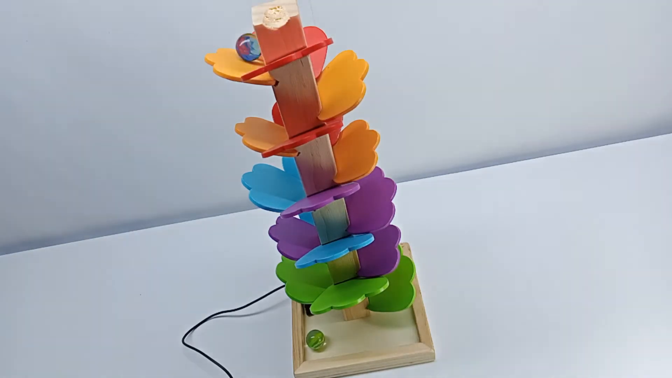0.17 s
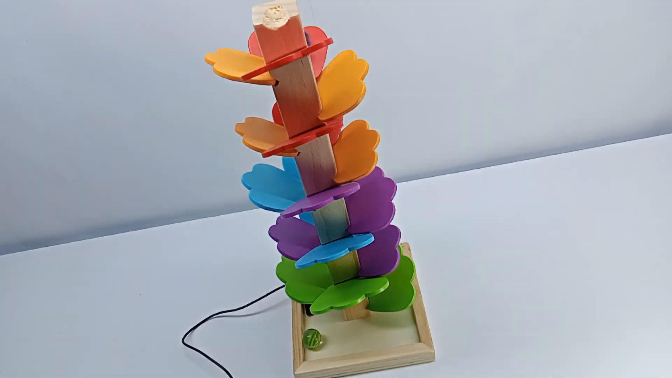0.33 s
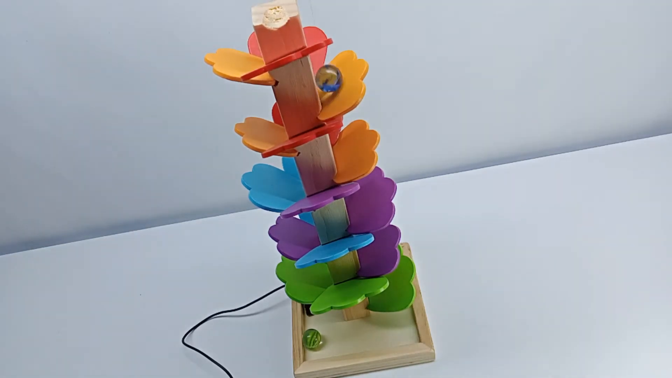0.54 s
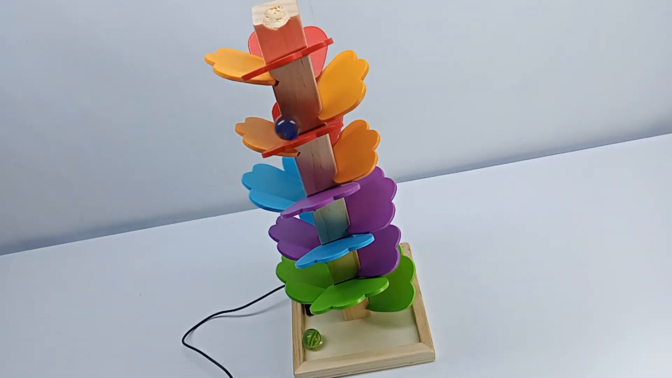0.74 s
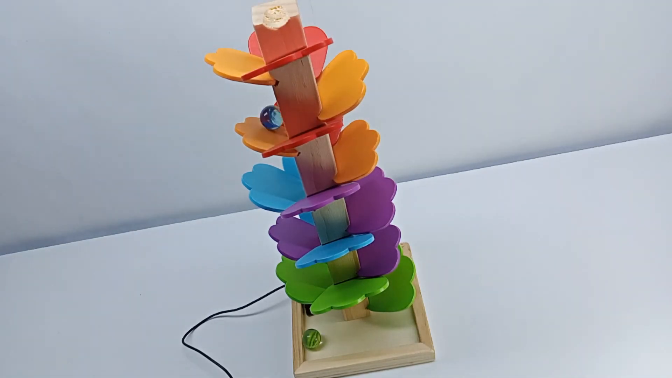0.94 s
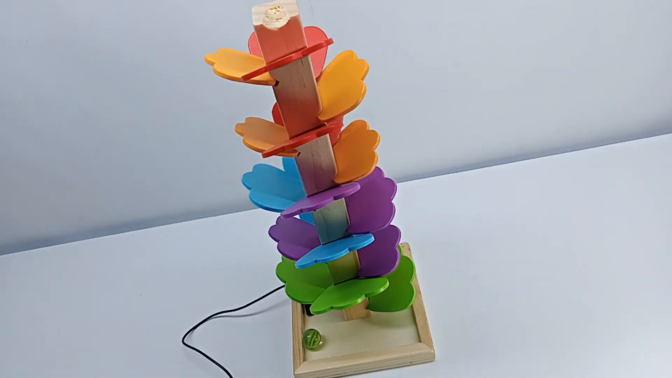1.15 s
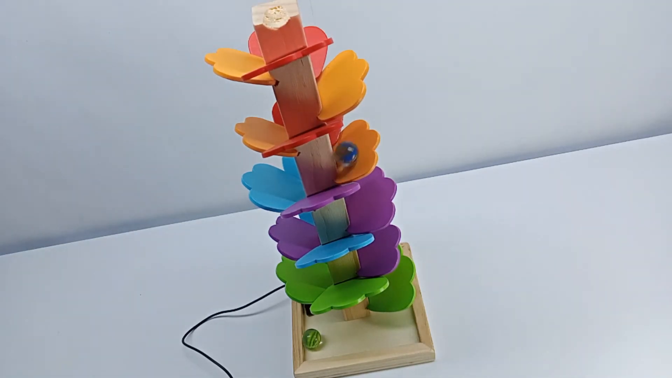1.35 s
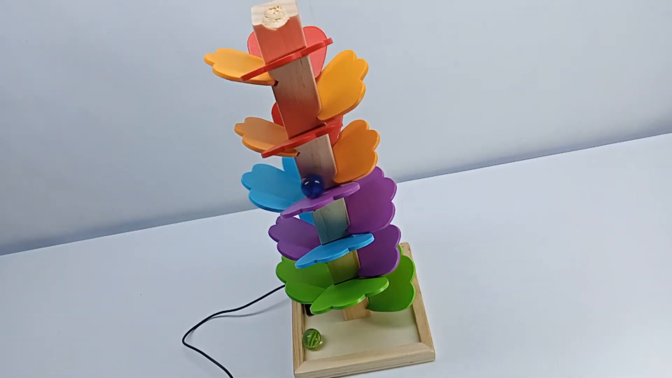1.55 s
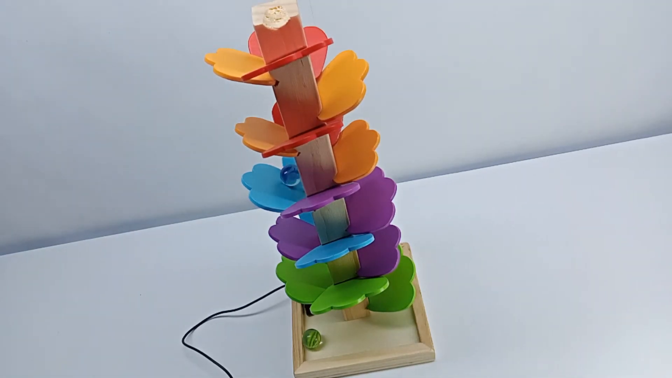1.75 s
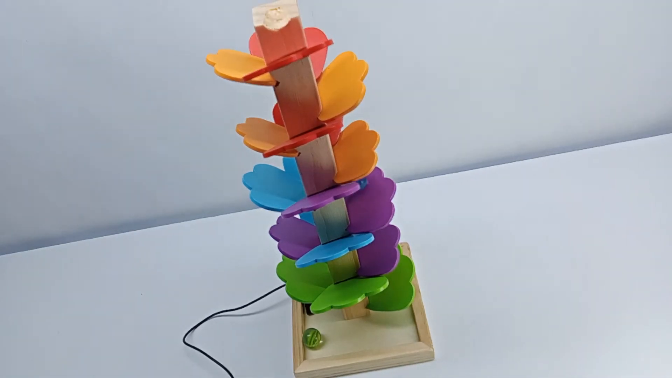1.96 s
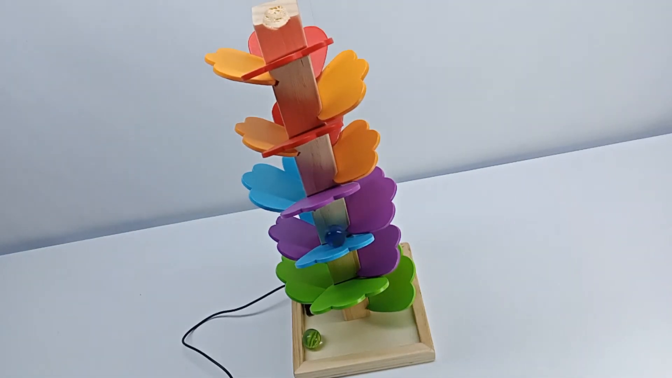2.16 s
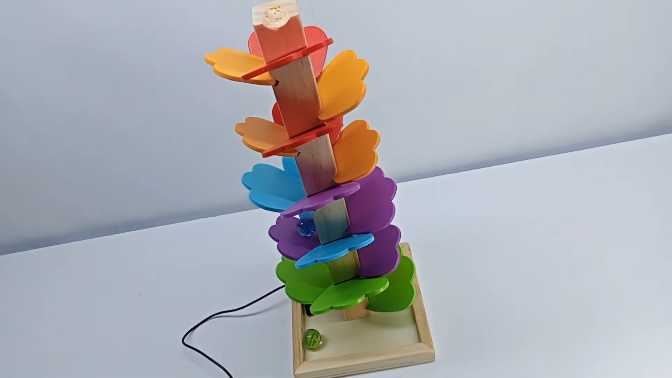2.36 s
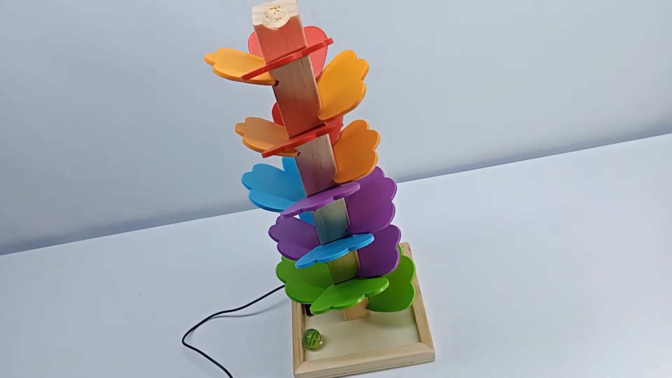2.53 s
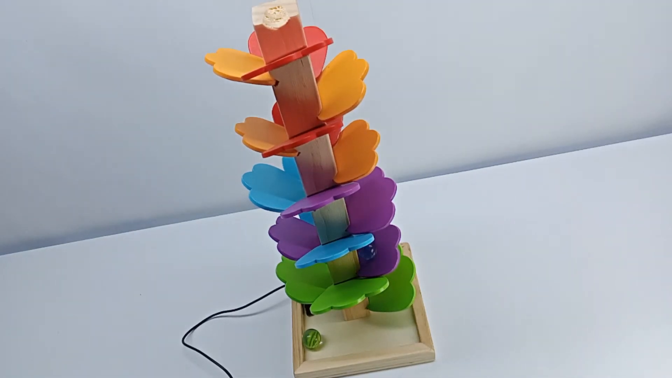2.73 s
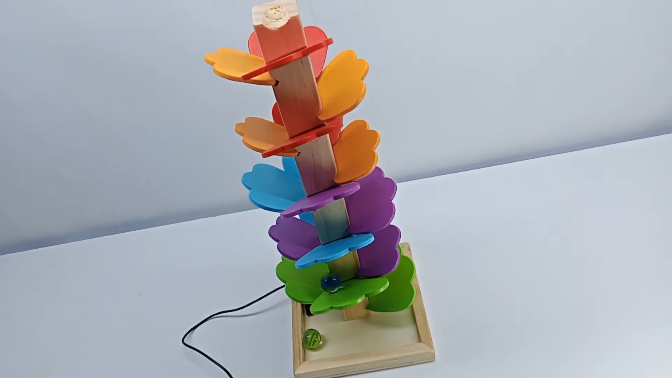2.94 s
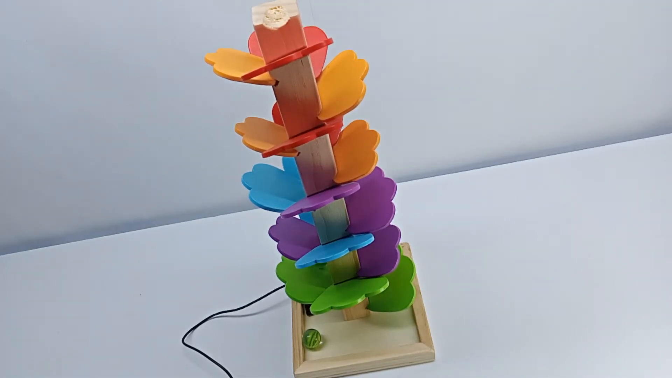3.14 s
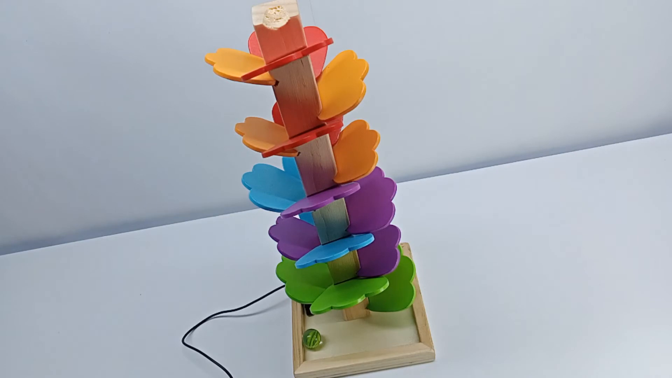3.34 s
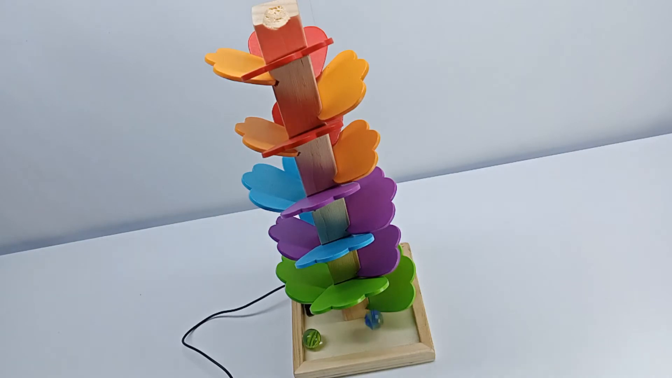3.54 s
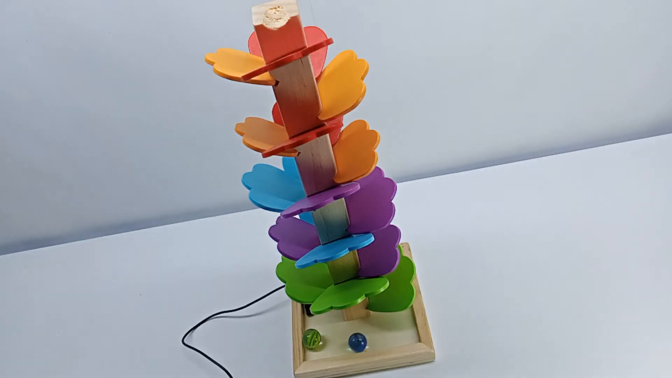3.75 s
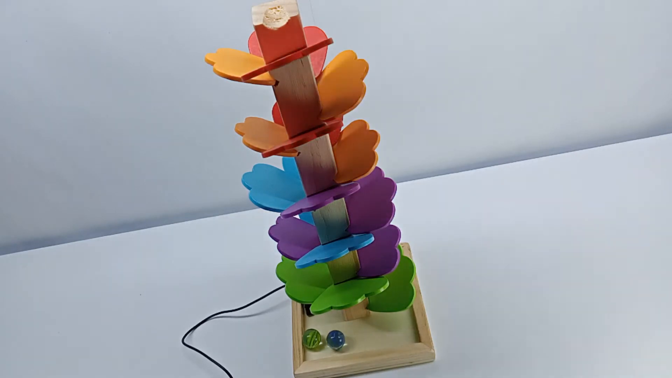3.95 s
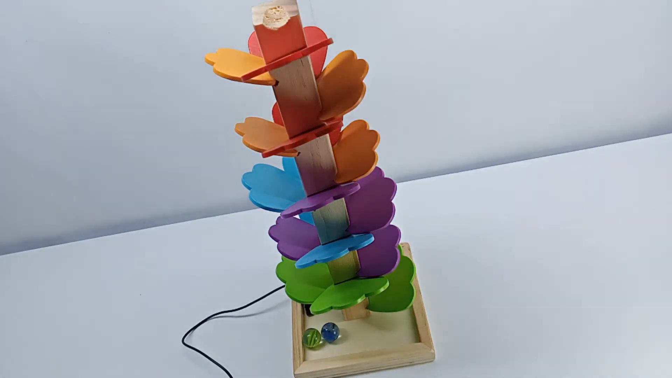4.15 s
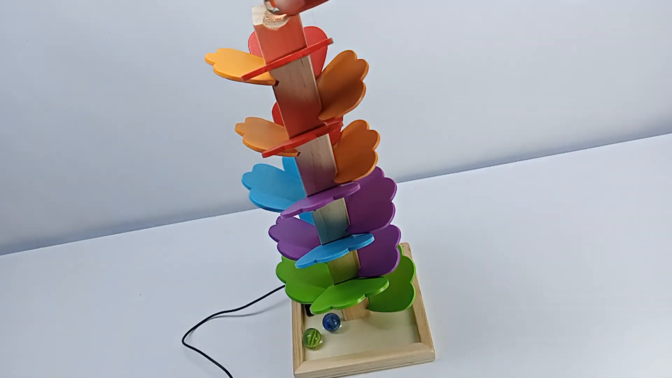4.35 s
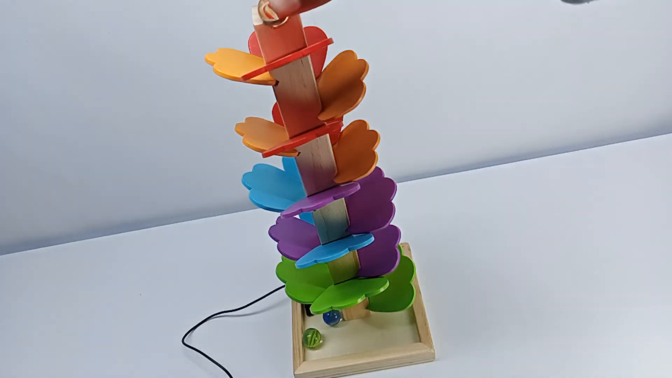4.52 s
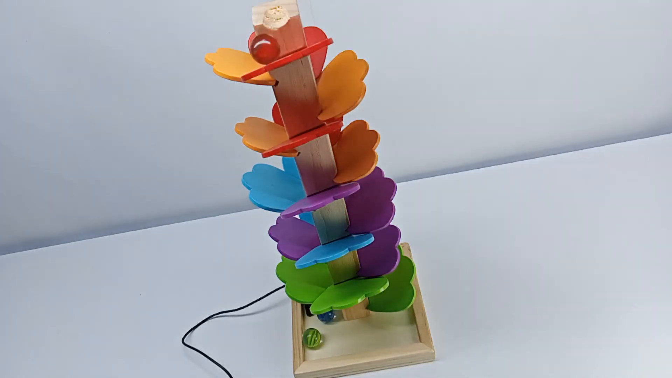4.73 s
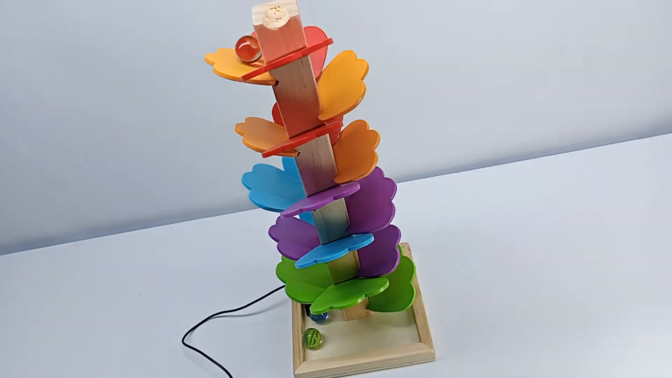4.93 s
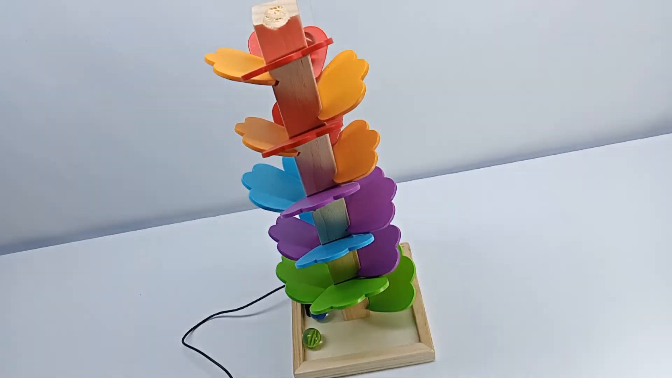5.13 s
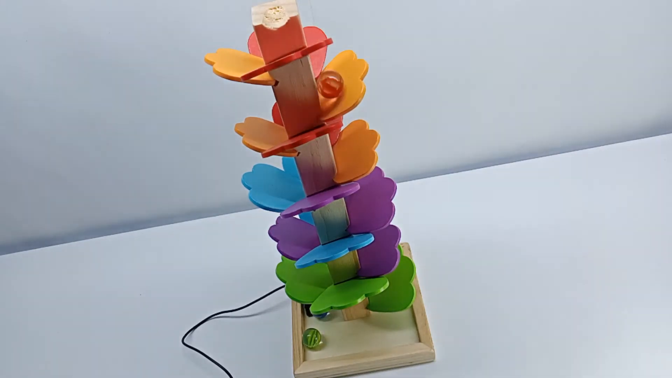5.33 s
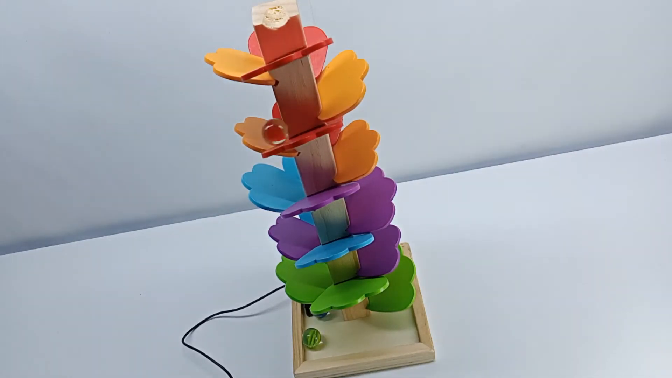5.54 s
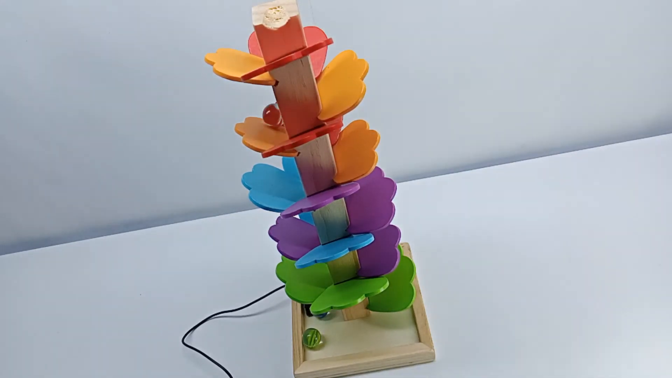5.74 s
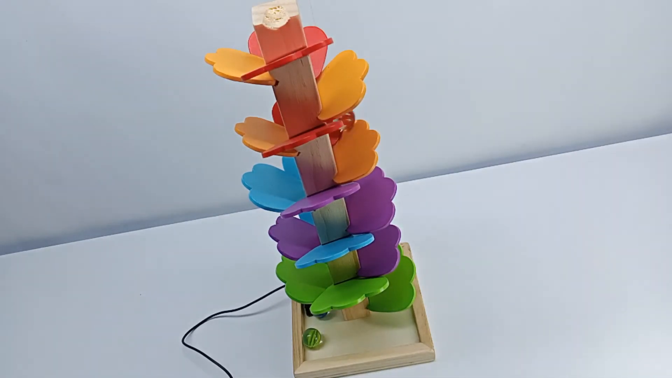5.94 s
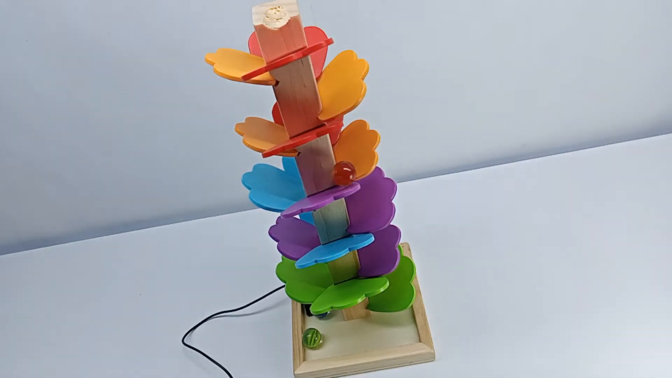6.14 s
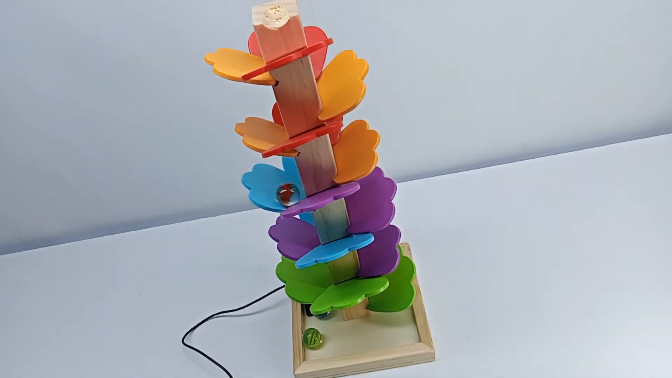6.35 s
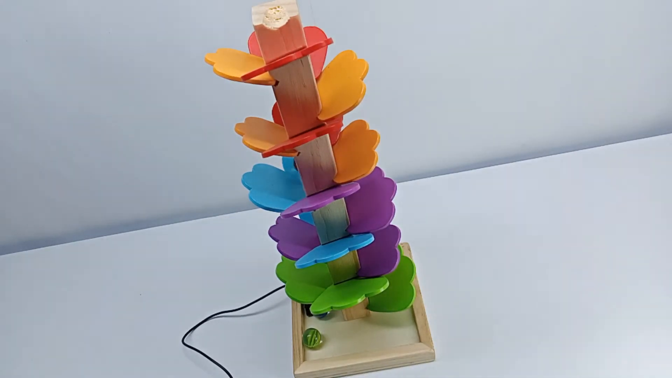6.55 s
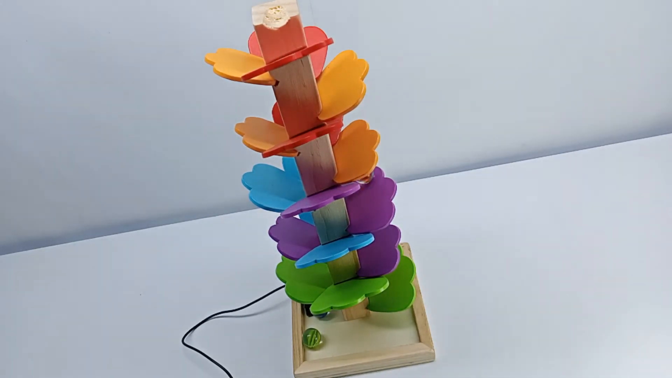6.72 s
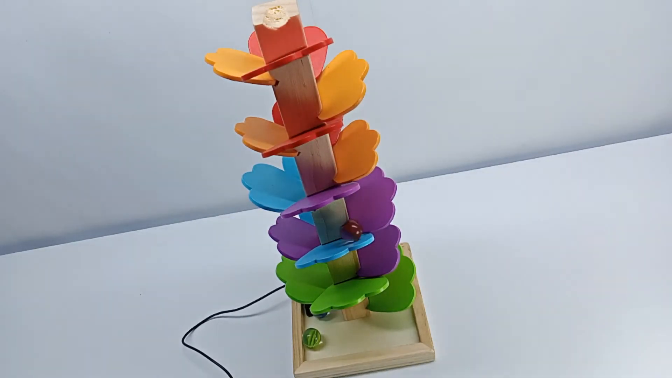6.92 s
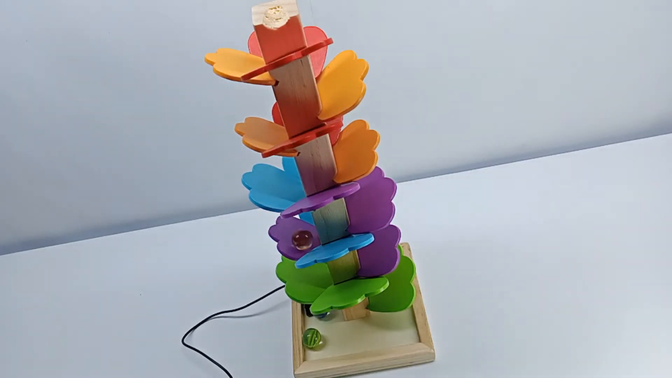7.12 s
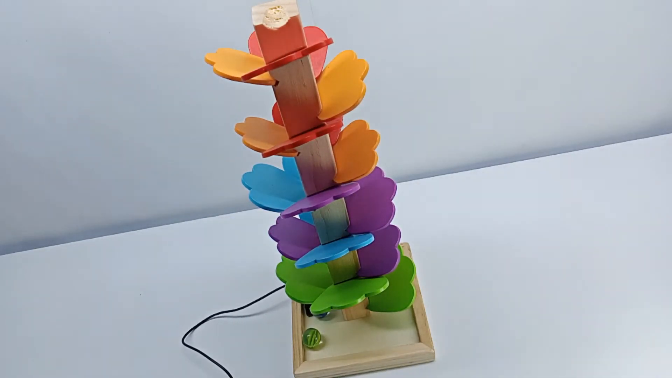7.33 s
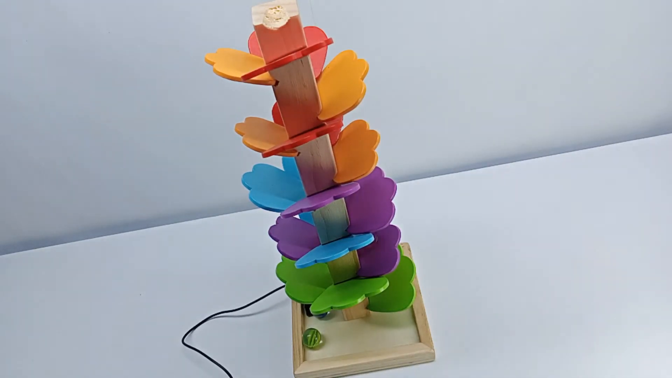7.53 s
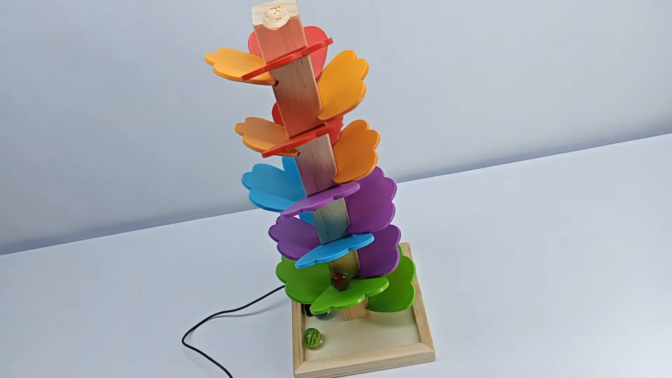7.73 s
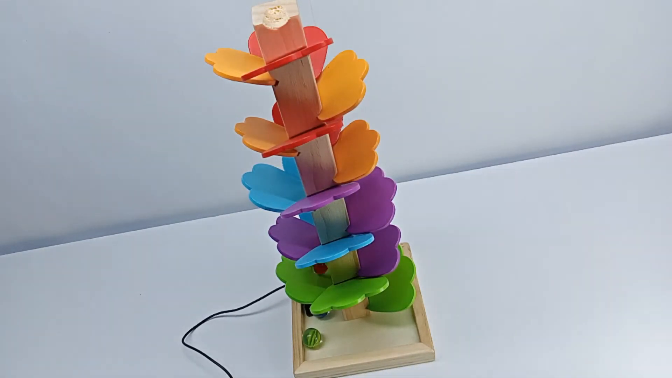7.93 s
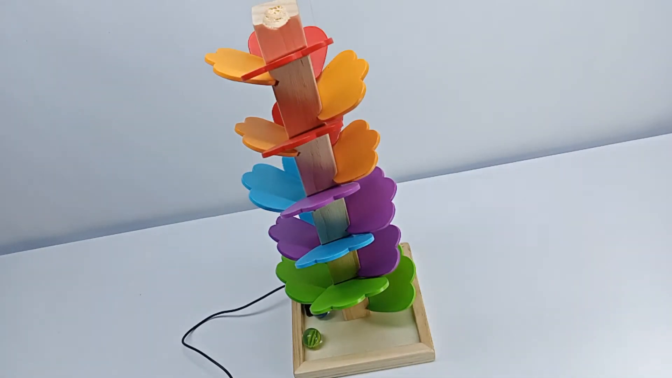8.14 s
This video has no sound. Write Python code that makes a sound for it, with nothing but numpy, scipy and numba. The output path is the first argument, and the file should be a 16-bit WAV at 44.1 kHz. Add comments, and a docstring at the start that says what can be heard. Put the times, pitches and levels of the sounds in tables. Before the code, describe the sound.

Hard, dry wooden clicks come in irregular clusters as a marble drops from leaf to leaf, each landing followed by smaller bounces and a brief rolling rattle. Two or three tray bounces end the first descent. Quiet air and slight hiss fill about a second, with barely audible handling, before another marble repeats the run and strikes glass. The close microphone sounds bright, with little room echo.

```python
"""A glass marble hops down a tower of thin wooden leaves, in a small dry room with quiet air and hiss.
Each blow rings the struck leaf and the tower and thumps the table; rolling ticks purr in the same leaf.
The marble bounces in the tray, making its modes ring, and taps another marble with short fading tones.
A faint tick, a thin squeak and a dull knock follow, built from short fading tones.
Then a second marble hops down and taps glass at the end; the close microphone has a bright treble peak."""
import sys
import numpy as np
from scipy import signal
from scipy.fft import rfft, irfft, next_fast_len
from scipy.io import wavfile
from scipy.ndimage import uniform_filter1d
from numba import njit

SR = 44100
rng = np.random.default_rng(int(sys.argv[2]) if len(sys.argv) > 2 else 0)


def store_pcm(level_fs):
    """Save levels as 16-bit WAV."""
    pcm = np.round(np.clip(level_fs, -1, 1) * 32767).astype(np.int16)
    wavfile.write(sys.argv[1], SR, np.atleast_2d(pcm).T)


def volts_from_db(level):
    """Convert decibel levels to linear amplitude ratios."""
    exponent = np.asarray(level, float) / 20
    return 10 ** exponent


N = 365139  # length in samples
SHORT_S = np.arange(4096) / SR  # time axis of a single blow, in s

# Levels below are relative; decay_s is the time to fall by 60 dB.
# landings and bounces on the leaves: start_s, level_db, high_hz, low_db (over the blow), crack_db (over the blow)
LEAF_BLOWS = [(-.012,-17.5,5000,-14.5,-18),(0.1192,-15,4150,-29,-3),(.153,-20.5,6100,-17,-12),(.185,-33.5,5140,-6,-18),(0.2958,-13.5,3360,-15,-12.5),(.336,-21,4200,-5.5,-8),(.358,-26.5,3850,-20,-16),
              (0.4504,-40,3100,-4,-21),(.470,-15.5,4310,-39,-4.5),(0.518,-15,5990,-41,-4.5),(0.553,-19.5,3500,-38,-11),(.580,-23,5100,-20,-14),(0.5964,-14,5440,-39,-10),(0.622,-29.5,5140,-10,-25),
              (.711,-12.5,3940,-10,-7),(.753,-18,4400,-6,-6.5),(0.779,-26.5,4860,-20,0),(0.791,-33,4960,-21,-14),(0.841,-32.5,4300,1,-7),(0.852,-31,4640,-13,-18),
              (.881,-16,4560,-11.5,-4),(0.92,-16,6320,-7,-9),(0.941,-25.5,5080,-2.5,-24),(0.989,-43,5370,-18,-27),(1.037,-28,5500,-10,-23),(1.0501,-39,5700,-11,-19),(1.0722,-15.5,4710,-8.5,0),
              (1.1032,-19.5,4840,-2.5,-1),(1.127,-35,4250,1,-22),(1.249,-41.5,4700,15.5,-11),(1.299,-16.5,4530,-39,-7),(1.335,-17,3400,-19,-10),(1.364,-19.5,5100,-5.5,-13),
              (1.392,-33,5070,-8,-15),(1.436,-14.5,5000,-6.5,-9),(1.464,-36,3430,-3.5,-21),(1.4809,-13.5,3090,-9,0),(1.525,-22.5,6350,4.5,-1),(1.552,-19.5,3850,-6,-4),(1.569,-31,4000,-4,-13),
              (1.628,-36,3750,-11,-19),(1.7223,-11.5,6430,-5.5,-7.5),(1.7426,-24,3600,3,-7),(1.833,-35,3110,-1.5,-3),(1.887,-10,3780,-12,-5),(1.9209,-15.5,3370,-9,-9),(1.9395,-26.5,3370,-16,-7),(1.9461,-29,3300,-22,-17),
              (2.0292,-12.5,6450,-7.5,-3),(2.053,-31.5,4000,-3,-3),(2.1499,-12.5,7550,-7,-5.5),(2.196,-19,3000,-1,-2.5),(2.215,-30,3150,1,-13),(2.355,-15,2980,-7,-4),
              (2.394,-14.5,3800,-16,-18),(2.4244,-21.5,6300,-10,-7),(2.437,-14,6400,-5,-6),(2.515,-12.5,3770,-11,-7),(2.537,-26,3180,-15,-16),(2.556,-35,3100,0.5,-14),(2.616,-38,3060,-10,-20),(2.6887,-16.5,6700,-1,-0.5),
              (2.721,-24.5,3320,4,0),(2.747,-37.5,3700,-8,-5),(2.892,-13.5,3420,-3,-11.5),(2.928,-36,3440,10,-10),(3.0085,-35,3540,7,-14),(3.0698,-11.5,7130,-6.5,-6.5),(3.101,-23,4620,6,-9),
              (3.2509,-13.5,3170,-12,-7),(3.266,-34.5,3920,-3.5,-4),(3.374,-29.5,3170,-13,-10),(3.447,-12.5,5400,-14,-14.5),(3.474,-34.5,3360,11.5,-2),
              (4.73,-9.5,6100,-14,-10.5),(4.9035,-15,4080,-46,-2.5),(4.937,-21,5740,-34,-15),(5.08,-15,3390,-41,-5),(5.1183,-21.5,3080,-7,-9.5),(5.14,-23.5,4390,-22,-8),
              (5.251,-13.5,4520,-43,-7.5),(5.301,-17,3800,-30,-3),(5.341,-17,5100,-11,-8),(5.3791,-14.5,5560,-36,-9.5),(5.407,-25.5,5380,-14,-13),(5.481,-12.5,4030,-14,-4.5),
              (5.5224,-20,4370,-7,-4.5),(5.5493,-21,5870,-24,-8),(5.565,-30,4720,-16,-20),(5.5734,-36,4780,-18,-18),(5.619,-24,4720,-6,-17),(5.648,-14,5450,-29,-3),(5.689,-15.5,6050,-16,-7),
              (5.711,-24.5,5200,-3,-17),(5.740,-34.5,5460,0,-15),(5.7951,-24,5470,-19,-13),(5.847,-12,3810,-44,-6),(5.875,-25,3760,-5,-6),(6.0235,-13.5,4460,-31,-5),
              (6.0505,-29.5,4230,-9,-5),(6.0642,-32.5,5550,-6,-22),(6.189,-26.5,5500,-10,-14),(6.2122,-13.5,3100,-13,-7.5),(6.251,-22.5,3900,-1.5,-3),(6.2783,-26.5,4020,0.5,-9),
              (6.294,-34,3730,-6,-1.5),(6.307,-33.5,3770,-2,-10),(6.379,-20,6000,-6.5,-3.5),(6.4344,-12,3960,-8,-6.5),(6.455,-24,3500,1,-9),(6.5556,-40,3080,-6,-4),(6.608,-12,3940,-13,-4),
              (6.637,-20,3496,-8,-9),(6.652,-30.5,3500,-24,-10),(6.725,-38,3270,-23,-22),(6.7684,-11.5,6650,-7.5,-5.5),(6.8,-27,3320,7,-5),(6.819,-26.5,5800,0,0),(6.965,-14,6930,-2,-6),
              (6.997,-25.5,7200,5.5,-5.5),(7.199,-14.5,3700,-4.5,-2),(7.2341,-15.5,3700,-5,-8.5),(7.258,-25,8600,-6,-6),(7.283,-15,3840,-8.5,-6.5),(7.296,-25,3840,-13,-4),
              (7.357,-10.5,3820,-15.5,-7),(7.535,-16,6460,-3.5,-2),(7.568,-22.5,3430,0,-0.5),(7.582,-30.5,3500,-20,-5),(7.722,-13.5,3420,-5,-13.5),(7.743,-25.5,3070,7,-10),
              (7.853,-34,3300,-16,-9),(7.901,-13.5,3390,-22,-5.5),(7.932,-19,3150,-9,-5),(7.948,-34,3000,10,-14),(8.032,-29,2910,-14,-12),(8.083,-13.5,3060,-16,-8),
              (8.103,-28.5,3000,4,-10),(8.191,-30.5,3500,-4,-3)]
# the rolling marble runs into the stem, a dull knock: start_s, level_db, low_hz, high_hz, thump_db
STEM_KNOCKS = [(.434,-28,2490,3900,-43.5),(0.823,-27,2600,4580,-47),(1.019,-19.5,2620,3000,-47),(1.2112,-21.5,2660,4290,-43),(1.5943,-18,2470,8400,-47),(1.816,-25.5,2600,3093,-46.5),
               (2.2732,-20.5,2700,3610,-40.5),(2.6314,-26,1880,3700,-47),(2.7975,-21,2140,3330,-43),(2.991,-26,1560,4600,-41.5),(3.1754,-33,1780,3060,-44),(3.3569,-24.5,1740,3310,-43.5),
               (3.552,-27,2330,3360,-51.5),(5.2244,-36,2420,4666,-43),(5.367,-30.5,1660,5000,-45),(5.594,-27.5,2615,4434,-45),(5.777,-20.5,2790,5230,-51.5),(5.9746,-19,2680,4750,-57),
               (6.17,-28,2010,5130,-46),(6.3478,-22.5,2250,3990,-41),(6.531,-31,2220,5440,-47),(6.736,-29,2070,3890,-56),(6.93,-20,2340,6170,-48),(7.083,-19,2600,4484,-42.5),
               (7.469,-28,1880,3000,-43.5),(7.6369,-19,2254,3610,-43.5),(7.83,-21.5,2600,3750,-43),(8.0049,-34.5,1670,3200,-46)]
# modes of the stem and neighbouring leaves: pitch_hz, level_db, decay_s
TOWER_MODES = [(1660, -17, 0.058), (2188, -11, 0.035), (2620, -14.5, 0.063), (3100, -9, 0.057),
               (3600, 0, 0.024), (4286, -5, 0.034), (4456, -1.5, 0.0046), (5000, 1.5, 0.02),
               (5430, -11, 0.047), (6100, 1.5, 0.02), (6700, -5.5, 0.036), (7200, -2, 0.024),
               (8076, 0, 0.014), (9173, -3.5, 0.013)]
# spectrum of the hard contact, with the microphone's treble peak: pitch_hz, level_db
CRACK_COLOUR = [(7000, -28), (8600, 5.5), (9800, -3.5), (11500, -11), (13300, -12), (14300, 2), (15200, 5),
                (15800, 11), (16300, -37), (17500, -50)]
# the stem answers according to where the marble is on it: time_s, pitch_hz, coupling_db
STEM_PATH = sum([ [(0.0, 534, 9), (0.43, 630, 4.5), (0.54, 558, 2), (0.6, 659, 6.5), (0.68, 607, -1.5),
             (0.72, 430, 7.5), (0.94, 624, -4.5), (1.18, 628, -6.5), (1.28, 518, 4.5), (1.43, 585, -0.5),
             (1.51, 496, -4), (1.73, 480, -0.5), (1.84, 690, -28), (1.88, 414, 2), (1.97, 524, -2),
             (2.05, 446, -3.5), (2.09, 544, -11.5), (2.58, 451, -6), (2.74, 513, -3.5), (2.76, 575, -8),
             (3.01, 557, -5.5), (3.07, 460, -8), (3.1, 637, -8.5), (3.51, 475, -14.5), (3.54, 590, -15),
             (3.65, 500, -5)], [(4.72, 496, 12.5), (4.85, 503, -1), (4.87, 651, -4), (4.92, 572.3, 4),
             (5.44, 609, 4), (5.48, 436.4, 4), (5.66, 505, -5), (5.68, 636.7, -5), (6.43, 461, -7),
             (6.48, 546, -21), (6.62, 406, -5), (6.86, 537.4, -7), (7.02, 446.2, -7), (7.05, 592.3, 0),
             (7.23, 451.2, -11), (7.27, 520.5, -11), (7.41, 402, -0.5), (7.65, 629, -20), (7.73, 410, -15),
             (7.79, 603.4, -6), (7.91, 512.5, -8), (7.97, 635, -19), (8.0, 400, -6), (8.08, 640, -21),
             (8.18, 450, -8), (8.28, 479, -19)], ], [])
# modes of the table top: pitch_hz, level_db, decay_s
TABLE_MODES = [(83, 0.5, 0.0082), (118, 0.5, 0.073), (150, -0.5, 0.058), (179.6, -8, 0.058),
               (231, -3, 0.047), (316, -5.5, 0.013), (365.4, -14, 0.051), (451, -18.5, 0.18),
               (560, -25, 0.034), (690, -10, 0.031), (900, -12.5, 0.082), (1200, -1.5, 0.014)]
# how hard the marble rolls: time_s, level_db
ROLL_LEVEL = [(0,-51),(.08,-64),(.3,-59.5),(.45,-62),(.65,-52),(.83,-58),(1.0,-46.5),(1.22,-53),(1.52,-51.5),(1.68,-62),(1.8,-42),(1.95,-57.5),(2.05,-36.5),(2.25,-43),(2.4,-66),
              (2.6,-55),(2.8,-50),(3.0,-52),(3.3,-48.5),(3.57,-46),(3.65,-65),(3.7,-120),(4.71,-120),(4.76,-84.5),(4.87,-56.5),(4.95,-54.5),(5.2,-53),(5.39,-67),(5.48,-57),(5.58,-50),
              (5.86,-55),(5.95,-55),(6.06,-52),(6.3,-55),(6.41,-60),(6.47,-46.5),(6.7,-45.5),(6.95,-49),(7.18,-54),(7.3,-48.5),(7.5,-47),(7.76,-53.5),(8.0,-50.5),(8.28,-56)]
# spectrum of quiet air and microphone hiss: pitch_hz, level_db
AIR_COLOUR = [(30, -29), (60, 2.5), (100, -5.5), (240, -10.5), (500, -14.5), (1100, -19), (2000, -26),
              (4000, -26.5), (7000, -28.5), (8600, -29), (11000, -40), (13700, -33), (15000, -16.5),
              (15800, -31.5), (16100, -43)]
# colour and decay of the room's tail: pitch_hz, level_db, decay_s
ROOM_COLOUR = [(122, -6.5, 0.48), (400, 1.5, 0.24), (1240, 1, 0.25), (3000, -9, 0.11), (6000, -7.5, 0.18),
               (10000, -0.5, 0.078), (15000, -6, 0.17)]
# leaves that ring on under the marble: start_s, stop_s, low_hz, high_hz, low_db, high_db
RINGING_LEAVES = [(.11, 0.697, 2900, 5440, -21, 2), (0.693, 1.466, 2620, 5000, -7, -0.5),
                  (4.89, 5.467, 2830, 5330, -34, 4), (5.47, 6.2, 2620, 4960, -7, -6),
                  (2.617, 2.884, 1740, 2300, 0, 7), (2.872, 3.283, 1733, 2620, 7.5, 13.5),
                  (3.34, 3.405, 1600, 2600, 4.5, 7.5), (3.43, 3.627, 1550, 2298, 5, 8.5),
                  (7.456, 7.685, 1710, 2300, -4, 7), (7.723, 8.056, 1736, 2620, 7.5, 13.5),
                  (8.064, 8.282, 1750, 2850, 8, -1.5)]
# bounces in the tray: start_s, level_db, crack_db (over the bounce)
TRAY_BOUNCES = [(3.66, -12, -13.5), (3.745, -14, -19), (3.782, -25.5, -15)]
# modes of the tray: pitch_hz, level_db, decay_s
TRAY_MODES = [(263, -35.5, 0.023), (456, -18, 0.053), (580, -20, 0.029), (940, -19, 0.043),
              (1197, -18, 0.039), (1600, -22, 0.03), (1900, -19, 0.047), (2600, -9.5, 0.036),
              (3060, 4.5, 0.019), (3540, -23, 0.11), (3940, -14.5, 0.048), (5000, -8.5, 0.0094),
              (6000, -19, 0.06), (6700, -10, 0.018), (7700, -4, 0.0086), (8650, -17, 0.021)]
# glass meets glass: start_s, level_db, decay_stretch (times), spread (share of pitch),
# contrast (times the tone levels in dB), knock_db (tray knock over the tap)
GLASS_TAPS = [(4.099, -38, 4, 0.16, 0.68, -29.5), (8.1775, -10.5, 0.5, 0.0062, 1.14, -27),
              (8.185, -28, 1.4, 0.0045, 0.77, -48), (8.197, -30, 2, 0.0044, 0.62, -39)]
# tones of a glass tap, with the microphone's peaks near 8.6 and 15 kHz,
# before stretch and contrast: pitch_hz, level_db, decay_s
TAP_TONES = [(1500, -26, .01), (3000, -26, .006), (4800, -22, .007), (6600, -17, .008), (8600, 0, .013),
             (10200, -19, .007), (12000, -24, .007), (15000, -9, .012)]


def on_log(hz, table, column):
    """Reads a table column between its rows, with pitch on a logarithmic scale."""
    rows = np.array(table, float)
    return np.interp(np.log(hz + 1), np.log(rows[:, 0]), rows[:, column])


def coloured(length, table):
    """Noise with the spectrum of a table, scaled to rms 1."""
    size = next_fast_len(length)
    hz = np.arange(size // 2 + 1) * SR / size
    spectrum = rfft(rng.standard_normal(length), size) * volts_from_db(on_log(hz, table, 1))
    noise = irfft(spectrum, size)[:length]
    return noise / noise.std()


def ring(modes, scatter_db, spread, rise_s, count=3):
    """One blow makes modes ring and fade, each split into close partners as in uneven wood. Peak 1."""
    hz, db, decay_s = np.repeat(modes, count, axis=0).T[:, :, None]
    t = SHORT_S[:int(SR * decay_s.max())]
    # each place of contact weights the partners anew
    level_chance, pitch_chance, phase = rng.standard_normal((3, len(hz), 1))
    envelope = volts_from_db(db + scatter_db * level_chance) * np.exp(-np.log(1000) * t / decay_s)
    tones = np.sin(2 * np.pi * hz * (1 + spread * pitch_chance) * t + phase)
    sound = (envelope * tones).sum(0) * (1 - np.exp(-t / rise_s))
    return sound / np.abs(sound).max()


def crack(decay_s):
    """The hard contact: a short burst of treble noise. Peak 1."""
    envelope = np.exp(-np.log(1000) * SHORT_S / decay_s) * (1 - np.exp(-SHORT_S / 0.00065))
    burst = coloured(len(SHORT_S), CRACK_COLOUR) * envelope
    return burst / np.abs(burst).max()


def add(out, start_s, sound):
    """Mixes a sound into out from its start; what lies before time 0 is lost."""
    i = int(start_s * SR)
    sound, i = sound[max(-i, 0):], max(i, 0)
    out[i:i + len(sound)] += sound[:N - i]


@njit
def svf(x, hz, width):
    """A resonance that can move in pitch: a band-pass filter with gain 1 at its centre."""
    y, band, low = np.empty(len(x)), 0., 0.
    for i in range(len(x)):
        g, k = np.tan(np.pi * hz[i] / SR), width / hz[i]
        v = (band + g * (x[i] - low)) / (1 + g * (g + k))
        band, low, y[i] = 2 * v - band, low + 2 * g * v, k * v
    return y


def steep(x, hz, width):
    """A resonance passed twice, fixed or moving, so little is left between the peaks."""
    hz = np.full(len(x), 1.) * hz
    return svf(svf(x, hz, width), hz, width)


def stem_at(t, axis):
    """Pitch (axis 1) or coupling (axis 2) of the stem mode at time t."""
    path = np.array(STEM_PATH)
    return np.interp(t, path[:, 0], path[:, axis])


def contacts():
    """Blows and knocks by time: start_s, level_db, low_hz, high_hz, low_db, crack_db, thump_db, stem_db."""
    leaf_low_hz = 2600  # shared by all leaves
    rows = []
    for s, db, high_hz, low_db, crack_db in LEAF_BLOWS:
        thump_db = -40 + 0.39 * db  # a soft blow loses less thump than ring
        rows.append((s, db, leaf_low_hz, high_hz, low_db, crack_db, thump_db, 0))
    for s, db, low_hz, high_hz, thump_db in STEM_KNOCKS:
        rows.append((s, db, low_hz, high_hz, -0.5, -7.5, thump_db, 15.5))  # extra stem ring
    return np.array(sorted(rows))


def leaves():
    """Each blow rings leaf, tower and stem, cracks at the contact and thumps the table a little later."""
    out, tower = np.zeros(N), np.array(TOWER_MODES)
    for s, db, low_hz, high_hz, low_db, crack_db, thump_db, stem_db in contacts():
        pitch_chance, stem_chance, thump_chance = rng.standard_normal(3)
        low_mode = [(low_hz * (1 + 0.03 * pitch_chance), 0, .03)]
        add(out, s, volts_from_db(db + low_db - 5.5) * ring(low_mode, 6.7, 0.035, 0.00013, count=5))
        add(out, s, volts_from_db(db - 7.5) * ring([(high_hz, 0, .018)], 1.2, .03, 0.00051))

        # a leaf drives best the tower modes near its own pitch, and a soft blow drives the others slightly less
        near_db = (0.05 * db - 2.5) * np.abs(np.log2(tower[:, 0] / high_hz))
        driven = tower + np.outer(near_db, (0, 1, 0))
        add(out, s, volts_from_db(db - 5.0) * ring(driven, 3.8, 0.0595, 0.00084, count=7))
        add(out, s, volts_from_db(db + crack_db) * crack(0.022))

        stem = ring([(stem_at(s, axis=1), 0, .06)], 2.3, 0.1202, 0.0014)
        stem_level_db = -51.5 + stem_at(s, axis=2) + stem_db + 0.43 * db + 3.6 * stem_chance
        add(out, s + 0.0011, volts_from_db(stem_level_db) * stem)
        # short dry click of the stem
        click = ring([(924, 0, .015), (1238, 0, 0.021)], 4.0, 0.094, 0.0004)
        add(out, s, volts_from_db(stem_db + 0.62 * db - 44.5) * click)
        add(out, s + .002, volts_from_db(thump_db + thump_chance) * ring(TABLE_MODES, 2.5, 0.054, 0.0027))
    return out


def grain_ticks():
    """Wood grain ticks densely under the rolling marble."""
    ticks = rng.standard_normal(N) * volts_from_db(3.5 * np.minimum(rng.exponential(size=N), 5))
    # the marble skips, so the ticks come in clumps of a few ms
    clumps = np.repeat(rng.standard_normal(N // 128 + 1), 128)
    clumps = uniform_filter1d(clumps, size=128)[:N]
    ticks = ticks * volts_from_db(11.6 * clumps)
    return ticks / ticks.std() + volts_from_db(-6) * rng.standard_normal(N)  # over the even hiss of fine grain


def last_contact(t):
    """Index of the latest blow or knock at each time t."""
    return np.clip(np.searchsorted(contacts()[:, 0], t) - 1, 0, None)


def roll_gain():
    """Strength of the rolling, which fades after each blow or knock."""
    t = np.arange(N) / SR
    since_s = np.maximum(t - contacts()[last_contact(t), 0], 0)
    fade_db_per_s = -24
    return volts_from_db(np.interp(t, *np.transpose(ROLL_LEVEL)) + fade_db_per_s * since_s)


def rolling(ticks):
    """Grain ticks make the leaf last struck, the tower and its stem purr."""
    t = np.arange(N) / SR
    _, _, low_hz, high_hz, low_db, _, _, _ = contacts()[last_contact(t)].T
    # the soft rolling contact reaches only the lower modes
    leaf = steep(ticks, low_hz, 210.0) * volts_from_db(12.5 + .4 * low_db)
    leaf = leaf + steep(ticks, np.minimum(high_hz, 5400), 700.0) * volts_from_db(8.5)
    tower = np.zeros(N)
    for hz, db, _ in TOWER_MODES:
        tower += volts_from_db(db + 5.5 - 2.5 * np.log2(hz / 3000)) * steep(ticks, hz, 410.0)
    treble = volts_from_db(-14.5) * coloured(N, CRACK_COLOUR) + volts_from_db(-7.5) * steep(ticks, 5800., 2000.)
    purr = leaf + tower + treble
    # the purr holds little below 1500 Hz
    purr = signal.sosfilt(signal.butter(4, 1500, "high", fs=SR, output="sos"), purr)

    stem_hz = stem_at(t, axis=1)
    stem = steep(steep(ticks, stem_hz, 280.0), stem_hz, 400.)
    stem = volts_from_db(-15.5 + stem_at(t, axis=2)) * stem / stem.std()
    return roll_gain() * (volts_from_db(-8.5) * purr / purr.std() + stem)


def air():
    """Quiet air and microphone hiss: steady coloured noise."""
    return volts_from_db(-78) * coloured(N, AIR_COLOUR)


def room(x):
    """Dense echoes that build up over the first 1.5 ms and fade at a rate set for each pitch."""
    t = np.arange(int(.35 * SR)) / SR
    tail = 0
    for hz in 90 * 2 ** np.arange(0, 7.6, .5):
        band = svf(rng.standard_normal(len(t)), np.full(len(t), hz), hz / 3)
        decay = np.exp(-np.log(1000) * t / on_log(hz, ROOM_COLOUR, 2))
        tail = tail + volts_from_db(on_log(hz, ROOM_COLOUR, 1)) * band * decay
    tail = tail * np.clip(t / 0.0015, 0, 1) ** 2
    return signal.fftconvolve(x, tail / np.sqrt(np.sum(tail ** 2)))[:N]


def ringing_leaves(ticks):
    """Narrow upper and broad lower leaves that ring on, fed by rolling and by every blow on them."""
    rows, out = contacts(), np.zeros(N)
    drive = volts_from_db(5.0) * ticks * roll_gain()
    blow_at = np.maximum(rows[:, 0] * SR, 0).astype(int)
    drive[blow_at] += volts_from_db(.5 * rows[:, 1] + 8.5)
    t = np.arange(N) / SR
    for start, stop, low_hz, high_hz, low_db, high_db in RINGING_LEAVES:
        progress = np.clip((t - start) / (stop - start), 0, 1)
        drift = 1 + 0.022 * (.5 - progress)  # the marble's weight moves across the leaf
        here = drive * (t > start) * (t < stop)
        out += volts_from_db(low_db) * steep(here, low_hz * drift, low_hz * .12)
        out += volts_from_db(high_db) * steep(here, high_hz / drift, high_hz * 0.049)
    return out


def tray_bounces():
    """The marble bounces on the tray floor: tray modes, a hard crack and a table thump."""
    out = np.zeros(N)
    for s, db, crack_db in TRAY_BOUNCES:
        add(out, s - .001, volts_from_db(db) * ring(TRAY_MODES, 1.6, 0.07, 0.0013, count=10))
        add(out, s - .001, volts_from_db(db + crack_db) * crack(.02))
        add(out, s + 0.00083, volts_from_db(db - 26.5) * ring(TABLE_MODES, 3.7, 0.043, .003))
    return out


def glass_taps():
    """Two marbles tap: short fading tones, with a low knock in the tray."""
    out = np.zeros(N)
    knock_modes = [(217, 17, 0.0096), (450, 5.0, 0.024), (720, -26.0, 0.007)]  # pitch_hz, level_db, decay_s
    for s, db, stretch, spread, contrast, knock_db in GLASS_TAPS:
        tones = np.multiply(TAP_TONES, (1, contrast, stretch))
        add(out, s, volts_from_db(db) * ring(tones, 0.7, spread, 0.00054 * stretch, count=20))
        add(out, s, volts_from_db(db + knock_db) * ring(knock_modes, 1.1, 0.21, 0.00014))
    return out


def squeak():
    """A faint tick with a thin squeak after it, then a dull low knock, all from fading tones."""
    out = np.zeros(N)
    # pitch_hz, level_db, decay_s
    tick_modes = [(1390, -12.0, 0.018), (2300, 1, 0.037), (2810, 2, 0.019), (3500, -11.5, .015)]
    squeak_modes = [(870, -4, 0.2), (1740, 6.0, 0.056), (2600, -1, 0.062)]
    low_modes = TABLE_MODES[:3]
    add(out, 4.423, volts_from_db(-58.5) * ring(tick_modes, 1.5, 0.022, 0.00065))
    add(out, 4.431, volts_from_db(-64.5) * ring(squeak_modes, .1, 0.0011, 0.0022, count=1))
    add(out, 4.43, volts_from_db(-70) * ring(low_modes, 1.5, .03, .004))
    add(out, 4.552, volts_from_db(-65.0) * ring(low_modes, 1.7, 0.0315, 0.0079))
    return out


def scene():
    """The tower, its tray, their room and the quiet air."""
    ticks = grain_ticks()
    near = leaves() + rolling(ticks) + ringing_leaves(ticks)
    near = near + tray_bounces() + glass_taps() + squeak()
    return (near + volts_from_db(-11.5) * room(near) + air())[None]


def roll_off(x):
    """The treble ends steeply here."""
    return signal.sosfilt(signal.butter(12, 17150, fs=SR, output="sos"), x)


def record(dry):
    """The recorder cuts the deepest bass below 64 Hz and the top above 16 kHz."""
    x = signal.sosfilt(signal.butter(4, 64, "high", fs=SR, output="sos"), dry)
    x = signal.sosfilt(signal.ellip(6, .2, 60, 16000, fs=SR, output="sos"), x)
    return roll_off(x)


dry = scene()
out = record(dry)
store_pcm(out)
```